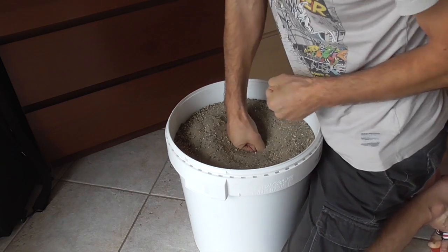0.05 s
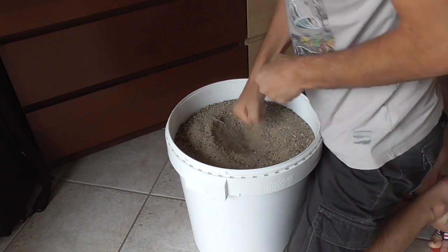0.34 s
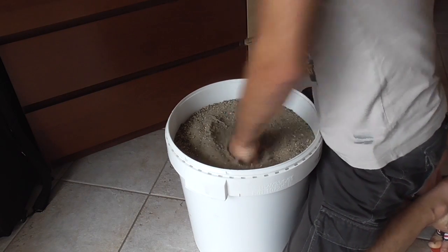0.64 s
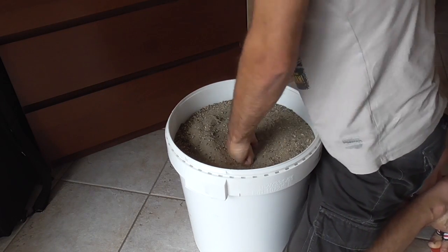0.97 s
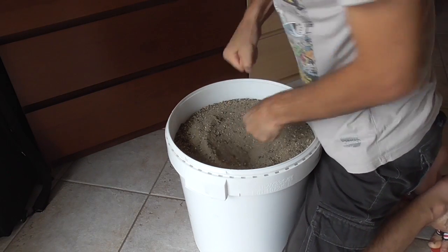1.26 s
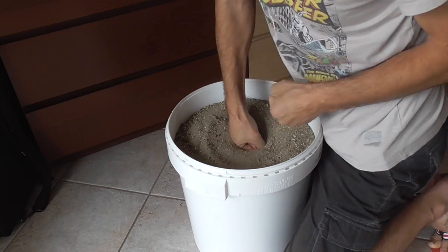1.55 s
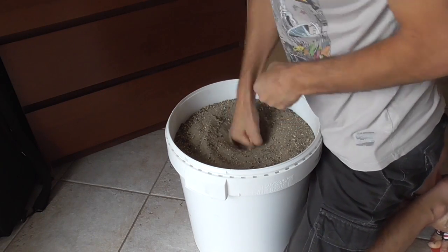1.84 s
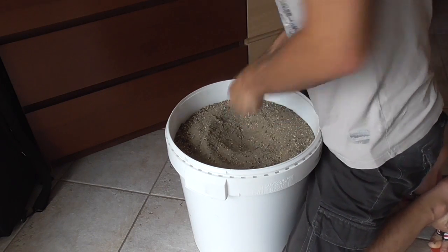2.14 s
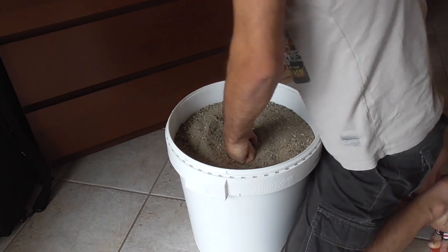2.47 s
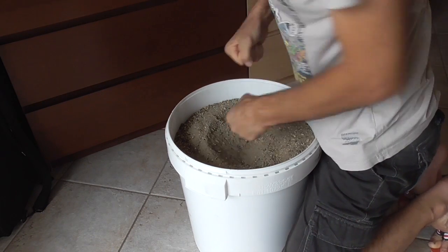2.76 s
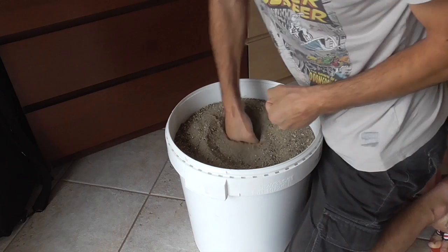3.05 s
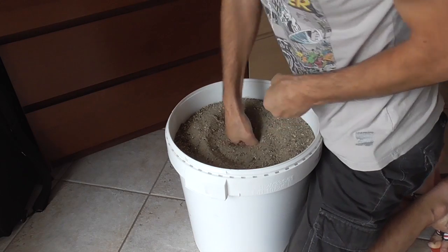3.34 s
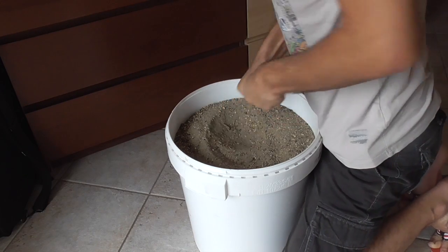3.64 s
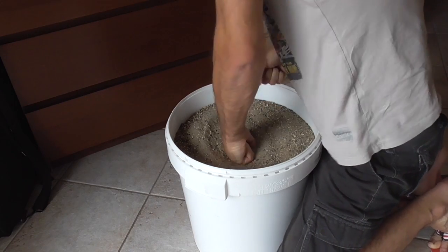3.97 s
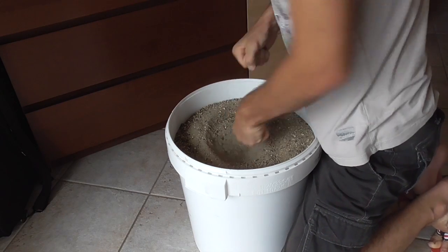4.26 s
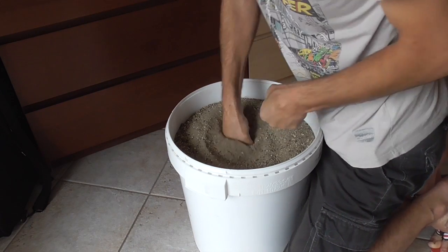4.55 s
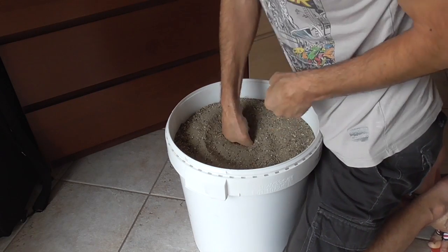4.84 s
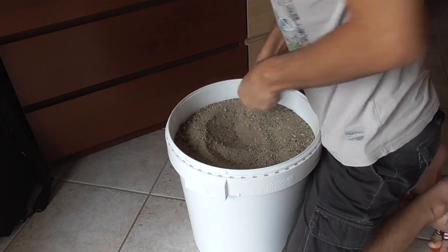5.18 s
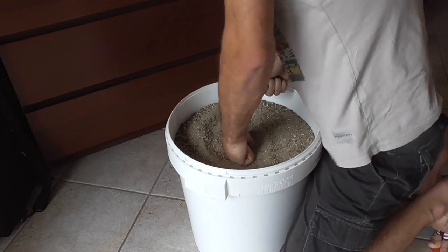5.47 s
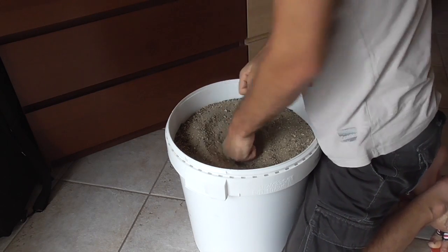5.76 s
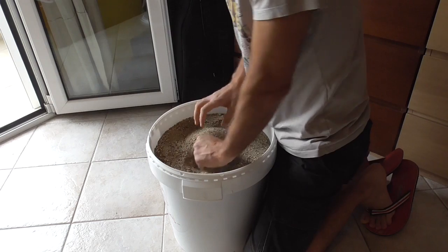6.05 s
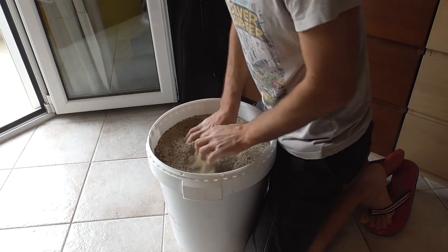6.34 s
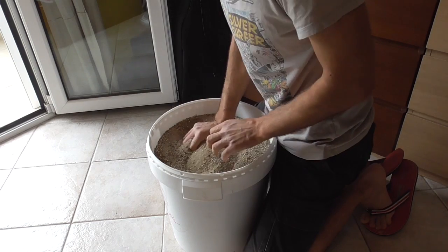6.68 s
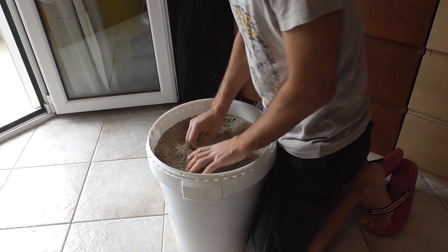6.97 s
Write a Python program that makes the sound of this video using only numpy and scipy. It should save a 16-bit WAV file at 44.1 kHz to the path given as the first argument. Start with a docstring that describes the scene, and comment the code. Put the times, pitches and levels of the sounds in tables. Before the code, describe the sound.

The sound opens on the tail of a punch into a plastic bucket of sand, close by in a small tiled room. Alternating fists land seven more blows at about 0.7, 1.5, 2.3, 3.1, 3.9, 4.6 and 5.4 seconds. Each is a dull, slightly hollow thud with a light slap, a brief gritty crunch and a short room echo. Thrown grains patter softly back at the start and around 0.9, 2.4 and 4 seconds. Underneath, an appliance gives a faint steady hum and airy rush, and small birds outside add quiet, high, falling chirps on and off until just after 6 seconds. At 6 seconds the background tone changes slightly, as if heard from another spot. From about 6.3 seconds to the end at 7, palms smooth the sand with a soft, dull rub and a fine hiss.

```python
"""Right and left fists punch down in turn into a plastic bucket of sand in a small tiled room. Each impact
slaps the surface, crunches in for a few milliseconds and is stopped by packed sand, which excites the low modes
of bucket and room. Thrown grains patter back. An appliance hums faintly and birds chirp outside. The background
changes abruptly at 6 s; at the end the palms smooth the sand by friction."""
import sys
import numpy as np
from scipy import signal
from scipy.fft import rfft, irfft
from scipy.io import wavfile
from scipy.ndimage import uniform_filter1d

SR = 44100
rng = np.random.default_rng(int(sys.argv[2]) if len(sys.argv) > 2 else 0)


def wav_record(signal):
    """Record a signal, one row per channel, as 16-bit PCM in the file named by sys.argv[1]."""
    frames = np.transpose(np.atleast_2d(signal))
    bounded = np.clip(frames, -1, 1)
    # unit amplitude maps onto the largest positive 16-bit level
    quanta = np.round(bounded * 32767).astype(np.int16)
    wavfile.write(sys.argv[1], SR, quanta)


N = 309136
TIME = np.arange(N) / SR
ANTIPHASE = np.array([[1], [-1]])  # left, right


def undb(db):
    """Amplitude ratio of a level in decibels."""
    return 10 ** (np.asarray(db) / 20)


def along_hz(points, hz):
    """Interpolation of (frequency, value) points on a logarithmic frequency axis."""
    point_hz, values = np.transpose(points)
    return np.interp(np.log(np.maximum(hz, 1)), np.log(point_hz), values)


def colour(noise, spectrum):
    """Spectral shaping of a steady noise, normalised to rms 1."""
    size = noise.shape[-1]
    gain = undb(along_hz(spectrum, np.fft.rfftfreq(size, 1 / SR)))
    shaped = irfft(rfft(noise) * gain, size)
    return shaped / np.sqrt(np.mean(shaped ** 2))


def add(track, start_s, sound):
    """Superposition: a sound sums into the track from its start time."""
    start = int(round(start_s * SR))
    sound = sound[max(-start, 0):N - start]
    track[max(start, 0):max(start, 0) + len(sound)] += sound


def wander(rate_hz):
    """Random modulation: smoothed steps with a spread near 1."""
    hold = int(SR / rate_hz)
    steps = np.repeat(rng.standard_normal(N // hold + 1), hold)[:N]
    return 1.3 * uniform_filter1d(uniform_filter1d(steps, hold), hold)


def grains(size, spectrum, spread_db):
    """Granular noise: dense tiny collisions of very unequal strength."""
    clicks = rng.standard_normal(size) * undb(spread_db * np.minimum(rng.exponential(size=size), 6))
    return colour(clicks, spectrum)


def burst(t, rise_s, decay_s):
    """Transient envelope: a quick rise and an exponential fall."""
    return (1 - np.exp(-t / rise_s)) * np.exp(-t / decay_s)


def damping(t, t60_s):
    """Exponential decay of 60 dB in t60_s."""
    return np.exp(-np.log(1000) * t / t60_s)


def glide(length_s, start_hz, end_hz, waver=0):
    """Exponential frequency sweep that swells and fades."""
    progress = np.linspace(0, 1, int(length_s * SR))
    hz = start_hz * (end_hz / start_hz) ** progress * (1 + waver)
    envelope = np.abs(np.sin(np.pi * progress)) ** 0.26
    return envelope * np.sin(2 * np.pi * np.cumsum(hz) / SR)


def highpass(sound, order, cutoff_hz):
    """Butterworth attenuation of the bass."""
    return signal.sosfilt(signal.butter(order, cutoff_hz, "high", fs=SR, output="sos"), sound)


def stereo_noise(size, width):
    """Partly coherent noise: long wavelengths arrive alike at left and right."""
    mid, side = rng.standard_normal((2, size))
    return mid + width * highpass(side, order=1, cutoff_hz=480) * ANTIPHASE


# fan spectra before and after the background changes at 6 s: frequency_hz, level_db
FAN_BEFORE = [(25, -32), (60, -9), (95, -13), (125, 0.5), (250, -2), (450, -4.5), (700, -7), (1000, -9),
              (1400, -16.5), (2000, -28), (3000, -33.5), (4400, -29), (6000, -36), (12000, -38.5)]
FAN_AFTER = [(25, -35), (60, -13), (95, -12), (125, 0), (250, 0.5), (450, -3.5), (700, -5),
             (1000, -9), (1400, -12), (2000, -25), (4000, -27), (12000, -34.5)]
def fan(changed):
    """Broadband flow noise of the appliance, its spectrum changing abruptly at 6 s."""
    first = undb(-46.5) * colour(stereo_noise(N, width=0.48), FAN_BEFORE)
    second = undb(-48) * colour(stereo_noise(N, width=0.31), FAN_AFTER)
    return ((1 - changed) * first + changed * second) * undb(0.4 * wander(rate_hz=6))


# partials of the appliance: pitch_hz, before_db, after_db (levels before and after 6 s)
HUM_PARTIALS = [(95.5, -57, -59.5), (435, -53, -55.5), (580, -59, -57.5), (630.4, -47.5, -79),
                (912, -65.5, -70)]
def hum(changed):
    """Steady vibration of the appliance: partials that drift slightly in level and pitch."""
    out = np.zeros(N)
    for pitch_hz, first_db, second_db in HUM_PARTIALS:
        level_db = first_db + changed * (second_db - first_db) + 0.9 * wander(rate_hz=12)
        hz = pitch_hz + 0.6 * wander(rate_hz=9)
        out += np.sqrt(2) * undb(level_db) * np.sin(2 * np.pi * np.cumsum(hz) / SR)
    return out


# a louder chirp is shorter and sweeps wider, between: level_db, length_s, start_hz, end_hz
SOFT_CHIRP, FULL_CHIRP = (-54.5, 0.19, 4899, 4399), (-47.5, 0.0742, 5201, 3699.5)
# calls of small birds outdoors: start_s, level_db
BIRD_CALLS = [(.059, -45), (.57, -45.5), (.825, -44), (1.662, -62), (2.122, -64), (2.472, -55),
              (2.842, -60), (3.17, -63), (3.452, -46.5), (4.218, -57), (4.882, -59), (5.061, -50),
              (5.539, -52.5), (5.884, -56.5), (6.102, -42)]
def birds():
    """Frequency modulation makes falling chirps buzz; reflections from outside walls smear them."""
    calls = np.zeros(N)
    level_range, *shape_ranges = zip(SOFT_CHIRP, FULL_CHIRP)
    for start_s, level_db in BIRD_CALLS:
        length_s, start_hz, end_hz = (np.interp(level_db, level_range, ends) for ends in shape_ranges)
        depth = 0.02 + 0.17 * np.log(start_hz / end_hz)  # wider sweeps waver more harshly
        waver = depth * wander(rate_hz=700)[:int(length_s * SR)]
        tone, overtone = (glide(length_s, k * start_hz, k * end_hz, waver) for k in (1, 2))
        add(calls, start_s, undb(level_db) * (tone + undb(-16) * overtone))
    yard = stereo_noise(SR, width=0.31) * damping(TIME[:SR], t60_s=0.93)
    yard /= np.sqrt(np.sum(yard ** 2) / 2)
    return signal.fftconvolve(calls[None], yard, axes=1)[:, :N]


# reverberation times of the tiled room: centre_hz, t60_s
ROOM_BANDS = [(200, 0.17), (600, 0.35), (1500, 0.28), (4000, 0.28), (10000, 0.33)]
def room_response():
    """Reverberation: dense reflections off tiles and cupboards die away band by band."""
    t = TIME[:SR // 2]
    spectrum = rfft(stereo_noise(len(t), width=0.16))
    hz = np.fft.rfftfreq(len(t), 1 / SR)
    tail = np.zeros((2, len(t)))
    for centre_hz, t60_s in ROOM_BANDS:
        band = along_hz([(band_hz, float(band_hz == centre_hz)) for band_hz, _ in ROOM_BANDS], hz)
        tail += irfft(spectrum * band, len(t)) * damping(t, t60_s)
    tail *= np.clip((t - 0.003) / 0.01, 0, 1)  # reflections build up after 3 ms
    return tail / np.sqrt(np.sum(tail ** 2) / 2)


# spectra of sliding sand: frequency_hz, level_db
RUB_SPECTRUM = [(120, -21), (330, 6.5), (600, 4.5), (1000, 0.5), (1600, -7.5), (2600, -13.5), (5000, -19),
                (9000, -46)]
HISS_SPECTRUM = [(1500, -32), (4000, 12), (6500, 2.5), (9000, 4), (10500, -8), (12000, -10)]
# relative levels along the stroke of the palms: time_s, rub_db, hiss_db
PALM_STROKE = [(6.28, -69, -72), (6.328, -58, -59.5), (6.514, -42, -60.5), (6.664, -48.5, -64),
               (6.828, -50.5, -60.5), (6.976, -55, -79), (7.0, -54, -87)]
def smoothing():
    """Sliding friction: palms push the sand level with a dull rub and a fine hiss."""
    time_s, rub_db, hiss_db = np.transpose(PALM_STROKE)
    rub = np.interp(TIME, time_s, undb(rub_db), left=0) * grains(N, RUB_SPECTRUM, spread_db=3.5)
    hiss = np.interp(TIME, time_s, undb(hiss_db), left=0) * grains(N, HISS_SPECTRUM, spread_db=4.0)
    return undb(-1) * rub + undb(3) * hiss


# spectrum of falling grains: frequency_hz, level_db
PATTER_SPECTRUM = [(500, -22), (1500, -0.5), (3000, -1), (5000, 0), (8000, 6.5), (12000, -1)]
# showers of thrown sand, the first two rows a brief rustle: start_s, level_db, decay_s
SHOWERS = [(.022, -40.5, 0.067), (.112, -35.5, 0.0059), (.209, -52, 0.11), (.849, -43, 0.016),
           (.9, -52, 0.068), (1.688, -48.5, .0057), (1.881, -50, 0.0035), (2.406, -37, 0.0057),
           (2.428, -35, 0.01), (2.706, -51, .003), (3.996, -37.5, 0.0029), (4.102, -52.5, .0043)]
def spills():
    """Many small impacts: grains land on sand and plastic rim, longer showers building more slowly."""
    out, t = np.zeros(N), TIME[:SR // 2]
    for start_s, level_db, decay_s in SHOWERS:
        envelope = undb(level_db) * burst(t, rise_s=0.22 * decay_s, decay_s=decay_s)
        add(out, start_s, envelope * grains(len(t), PATTER_SPECTRUM, spread_db=2.5))
    return out


# spectrum of grinding sand: frequency_hz, level_db
CRUNCH_SPECTRUM = [(500, 13), (1200, -7), (2200, 5.5), (3000, -2.5), (4300, 3.5), (6000, -3), (8500, -0.5),
                   (12000, -11.5)]
def crunch(grind_db, slide_db):
    """Granular friction: grains grind under the fist, then the crater wall slides on."""
    t = TIME[:SR // 2]
    grind = burst(t, rise_s=0.0038, decay_s=0.0101) * grains(len(t), CRUNCH_SPECTRUM, spread_db=3.0)
    slide = burst(t, rise_s=0.0064, decay_s=0.079) * grains(len(t), CRUNCH_SPECTRUM, spread_db=2.5)
    return undb(grind_db) * grind + undb(slide_db) * slide


# spectrum of knuckles slapping sand: frequency_hz, level_db
SPLAT_SPECTRUM = [(250, -25), (600, 3.5), (950, -1), (1400, -4), (2000, -20), (2800, -17.5), (6000, -30)]
def smack(pitch_hz, splat_db):
    """Contact transient: the knuckles land first, with a damped tone and a splat of noise."""
    t = TIME[:SR // 2]
    knock = burst(t, rise_s=0.0012, decay_s=0.0027) * np.sin(2 * np.pi * pitch_hz * t)
    splat = burst(t, rise_s=0.00053, decay_s=0.0061) * grains(len(t), SPLAT_SPECTRUM, spread_db=2.0)
    return undb(0.5) * knock + undb(splat_db) * splat


def pop(start_hz):
    """Cavity resonance: the hollow under the fist falls in pitch as more of the hand meets the sand."""
    fall_octaves = 1.253
    return glide(length_s=0.0148, start_hz=start_hz, end_hz=start_hz / 2 ** fall_octaves)


# joint modes of bucket and room: pitch_hz, left_fist_db, right_fist_db, t60_s
BUCKET_MODES = [(53.1, -32.5, -35.5, 1), (107.3, -20.5, -25, 0.25), (120.2, -29, -35.5, 0.37),
                (136.9, -24, -25.5, 0.35), (174, -20, -22, 0.26), (201.3, -21, -19.5, 0.3),
                (212.4, -36.5, -32, 0.51), (235.8, -21.5, -16, 0.25), (265.8, -25.5, -28.5, 0.41),
                (288, -33, -41, 0.49), (323.5, -21.5, -23.5, 0.24), (343.3, -29.5, -22, 0.21),
                (353.4, -20, -22, 0.21), (400, -21, -23.5, 0.22), (441, -17.5, -21, 0.22),
                (473.3, -22, -24, 0.29), (532.4, -18.5, -16, 0.13), (578, -29, -27, 0.33)]
def thud(is_right, cutoff_hz):
    """Modal excitation: packed sand stops the fist in one Gaussian push, peaking lead_s into the sound."""
    t, ring = TIME[:SR], np.zeros(SR)
    for pitch_hz, left_db, right_db, t60_s in BUCKET_MODES:
        gain = undb(right_db if is_right else left_db)
        ring += gain * np.cos(2 * np.pi * pitch_hz * t) * damping(t, t60_s)
    lead = SR // 200
    push_time = np.arange(-lead, lead + 1) / SR
    push = np.exp(-0.5 * (2 * np.pi * cutoff_hz * push_time) ** 2)
    lead_s = lead / SR
    return signal.fftconvolve(ring, push / push.sum()), lead_s


# how the left, then the right fist lands: sink_s, cutoff_hz, splat_db, grind_db, slide_db
FIST_LANDINGS = [(0.00787, 400, -3.5, -25, -40), (0.00727, 397, -10, -28, -42.5)]
# alternating blows, right fist first: start_s, thud_db, pop_db, pop_start_hz, smack_db, smack_hz
BLOWS = [ (-.095, 3, -18, 570, -22, 910), (0.7113, 1.5, -10.5, 474, -11, 712),
         (1.493, 5.5, -14, 584, -7.5, 927), (2.2846, 2.5, -22, 569, -21, 1116),
         (3.0947, 5.5, -16, 526, -12.5, 818), (3.867, 5, -12.5, 566, -14, 1078),
         (4.6026, 3, -17.5, 584, -12, 830), (5.374, 5.5, -11, 565, -13, 824)]
def punches():
    """Inelastic impact: a flatter fist pops louder, stops more abruptly and grinds more sand."""
    thuds, smacks, sand = np.zeros((3, N))
    usual_pop_db, cutoff_octaves_per_db = -13, 0.07
    for k, (start_s, thud_db, pop_db, pop_start_hz, smack_db, smack_hz) in enumerate(BLOWS):
        is_right = k % 2 == 0
        sink_s, cutoff_hz, splat_db, grind_db, slide_db = FIST_LANDINGS[is_right]
        flatness_db = pop_db - usual_pop_db
        ring, lead_s = thud(is_right, cutoff_hz * 2 ** (cutoff_octaves_per_db * flatness_db))
        add(thuds, start_s + sink_s - lead_s, undb(thud_db) * ring)
        add(thuds, start_s, undb(pop_db) * pop(pop_start_hz))
        add(smacks, start_s, undb(smack_db) * smack(smack_hz, splat_db))
        add(sand, start_s, crunch(grind_db + 0.39 * flatness_db, slide_db))
    return thuds, smacks, sand


def scene():
    """Superposition of the nearby bucket's direct sound, its reflections and the background."""
    thuds, smacks, sand = punches()
    thuds = highpass(thuds, order=3, cutoff_hz=102.6)  # a small bucket radiates little deep bass
    sand = sand + spills() + smoothing()
    thud_pan = undb([[-0.5], [0.5]])  # slightly to the right
    direct = thud_pan * thuds + smacks + undb(0.5) * sand
    room = room_response()
    to_room = undb(-17) * thuds + undb(-3.5) * smacks + undb(-5.5) * sand
    echoes = signal.fftconvolve(to_room[None], room, axes=1)[:, :N]
    # reflections from the side walls widen the blows
    to_walls = undb(-7) * thuds + undb(-16) * smacks + 0.16 * sand
    lateral = signal.fftconvolve(to_walls, room[0] - room[1])[:N] * ANTIPHASE
    change_s = 5.992
    changed = np.clip((TIME - change_s) / 0.0034, 0, 1)  # 0 before the background changes, 1 after
    return direct + echoes + lateral + birds() + fan(changed) + hum(changed)


def record(dry):
    """Band limiting: a steep low-pass removes the treble above 12.1 kHz."""
    return signal.sosfilt(signal.ellip(10, 0.2, 70, 12100, fs=SR, output="sos"), dry)


dry = scene()
out = record(dry)
wav_record(out)
```